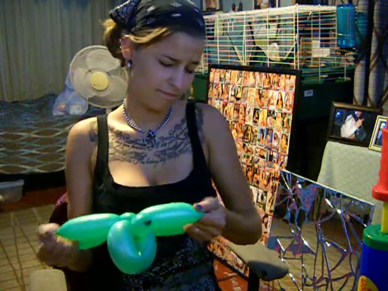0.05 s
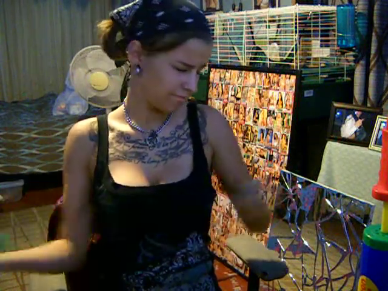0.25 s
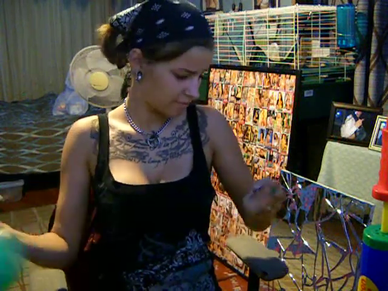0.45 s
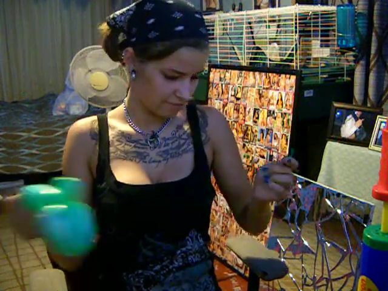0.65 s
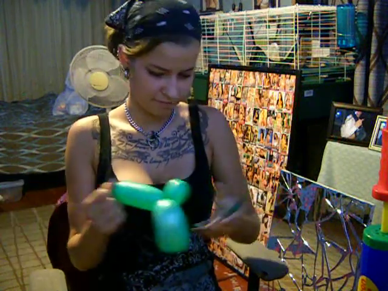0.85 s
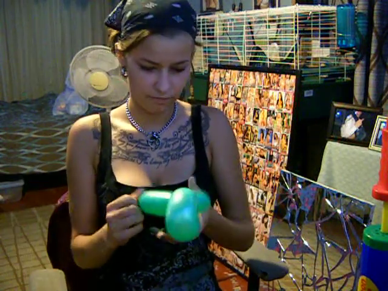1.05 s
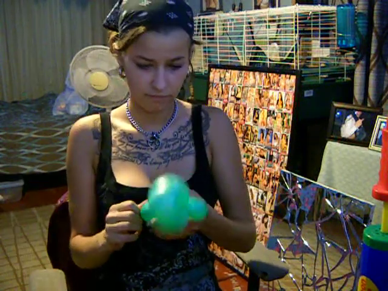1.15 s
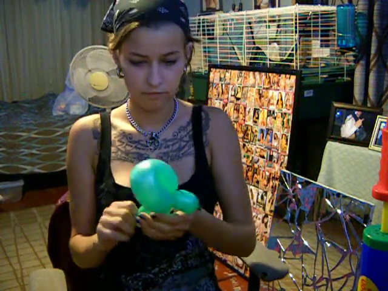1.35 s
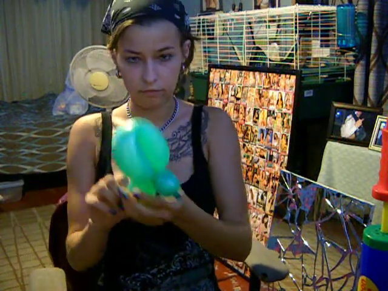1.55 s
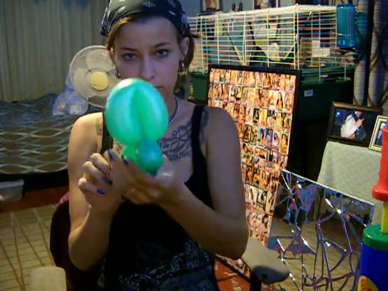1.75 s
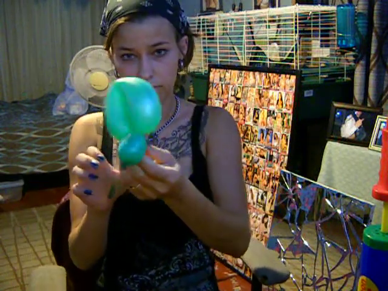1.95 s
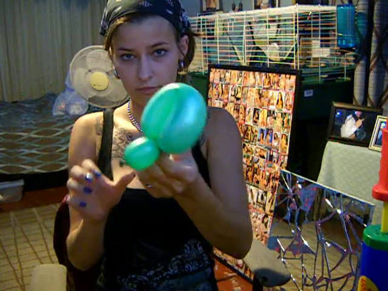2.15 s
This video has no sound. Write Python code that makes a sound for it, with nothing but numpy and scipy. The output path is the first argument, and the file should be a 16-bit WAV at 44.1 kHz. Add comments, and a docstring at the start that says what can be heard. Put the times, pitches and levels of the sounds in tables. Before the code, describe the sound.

A balloon pops loudly after a brief, faint creak of stretched rubber, overloading a muffled microphone in a small, quiet room. Light ticks of falling shreds follow, then soft hollow handling bumps and one short rubbery squeak.

```python
"""Low room noise and hum run throughout. A twisted latex balloon creaks in stick-slip as it is pulled.
At 0.24 s and 0.27 s two chambers burst, each a ringing thump of air and a crack of tearing skin;
the bang overloads the narrow-band microphone and the recorder. Scraps tick down from 0.46 s.
From 0.94 s hands catch the rest with soft bumps; near 1.8 s a finger squeaks across the rubber.
A small room adds a short tail to each event."""
import sys
import numpy as np
from scipy import signal
from scipy.fft import rfft, irfft
from scipy.io import wavfile
from scipy.ndimage import uniform_filter1d

SR = 44100
rng = np.random.default_rng(int(sys.argv[2]) if len(sys.argv) > 2 else 0)


def wrap_up_sound(samples):
    """Save the sound to the file named by the first command line argument, as 16-bit audio."""
    columns = np.atleast_2d(samples).T
    # keep every value between -1 and 1, then stretch to whole-number steps
    tamed = np.clip(columns, -1, 1)
    steps = np.round(tamed * 32767).astype(np.int16)
    wavfile.write(sys.argv[1], SR, steps)


N = 97020

# bursting chambers: t/s, thump level/dB, ring time factor, rip delay/s, rip level/dB, rip t60/s
CHAMBERS = [(.2392, 7.5, 0.57, 0.00029, -7, .04), (.2712, 4, 0.98, .0060, 1.5, 0.091)]


def undb(db):
    """Decibels to gain."""
    return 10 ** (np.asarray(db) / 20)


def unit(x):
    """Scale to rms 1."""
    return x / np.sqrt(np.mean(x ** 2))


def since(start_s=0):
    """Seconds since start_s, per sample."""
    return np.arange(N) / SR - start_s


def curve(table, column=1):
    """Table column, linearly interpolated in time."""
    rows = np.array(table)
    return np.interp(since(), rows[:, 0], rows[:, column])


def colour(x, spectrum):
    """Shape x by (f/Hz, level/dB) points; rms 1."""
    hz, db = np.array(spectrum).T
    bins_hz = np.maximum(np.fft.rfftfreq(N, 1 / SR), 1)
    gain = undb(np.interp(np.log(bins_hz), np.log(hz), db))
    return unit(irfft(rfft(x) * gain, N))


def noise(spectrum):
    """Coloured noise, rms 1."""
    return colour(rng.standard_normal(N), spectrum)


def fade(start_s, t60_s, hold_s=0):
    """Sudden onset, hold, exponential decay."""
    t = since(start_s)
    return (t >= 0) * np.exp(-np.log(1000) * np.maximum(t - hold_s, 0) / t60_s)


def attack(start_s, rise_s):
    """Linear rise from 0 to 1."""
    return np.clip(since(start_s) / rise_s, 0, 1)


def strike(start_s, modes, ring=1):
    """Decaying modes excited together; ring scales their t60."""
    return sum(undb(db) * fade(start_s, t60_s * ring) * np.sin(2 * np.pi * hz * since(start_s))
               for hz, db, t60_s in modes)


def room(x, wet_db):
    """Add a small room's dense reverberation; treble dies sooner."""
    gap_s = 0.0024
    white = rng.standard_normal(N)
    low = signal.sosfilt(signal.butter(2, 1500, fs=SR, output="sos"), white)
    tail = low * fade(gap_s, t60_s=0.23) + (white - low) * fade(gap_s, t60_s=0.19)
    return x + undb(wet_db) * signal.fftconvolve(x, tail / np.linalg.norm(tail))[:N]


def microphone(x, edge_hz=3782, order=14.9):
    """Steep low-pass of the narrow-band microphone."""
    bins_hz = np.fft.rfftfreq(N, 1 / SR)
    return irfft(rfft(x) / np.sqrt(1 + (bins_hz / edge_hz) ** (2 * order)), N)


def saturate(x, ceiling, knee):
    """Flatten peaks at the ceiling; a higher knee is harder."""
    return x / (1 + np.abs(x / ceiling) ** knee) ** (1 / knee)


def background():
    """Steady room noise and a low, wavering hum."""
    floor_spectrum = [(12, -20.5), (25, -1.5), (45, -6), (90, -10), (180, -8.5), (520, -5.5), (900, -9),
                      (1400, -16.5), (2300, -17), (3500, -19.5), (4200, -21), (5200, -55)]  # f/Hz, level/dB
    hum_tones = [(27, -59.5), (59.2, -55)]  # f/Hz, level/dB
    hum_waver = [(0, 5), (.75, -7), (1.1, 0.5), (1.7, -3), (2.1, 4)]  # t/s, gain/dB
    hum = sum(undb(db) * np.sqrt(2) * np.sin(2 * np.pi * (hz * since() + rng.random()))
              for hz, db in hum_tones)
    return undb(-51) * noise(floor_spectrum) + undb(curve(hum_waver)) * hum


def rubbing(tilt_db_per_oct=0):
    """Dense friction through the latex resonances, band-limited; rms 1."""
    latex_spectrum = [(60, -15), (250, -14.5), (550, 2), (800, -3), (1080, -1), (1600, -16), (2200, -2),
                      (2800, -10.5), (3500, -6), (4500, 9)]  # f/Hz, level/dB
    tilted = [(hz, db + tilt_db_per_oct * np.log2(hz)) for hz, db in latex_spectrum]
    return unit(microphone(noise(tilted)))


def bumps():
    """Hands meet the balloon: a hollow bump and a brush of its skin."""
    touches = [(.940, -35.5, -45.5), (0.9557, -32, -49), (1.015, -38.5, -42.5), (1.472, -64, -47),
               (1.553, -51.5, -44), (1.65, -54.5, -48)]  # t/s, bump level/dB, brush level/dB
    balloon_modes = [(128.3, -8, 0.075), (175, -2, 0.095), (354, 4, 0.047), (475, 8, 0.025),
                     (615, -9, 0.043)]  # f/Hz, level/dB, t60/s
    out = 0
    for start_s, bump_db, brush_db in touches:
        bump = undb(bump_db) * strike(start_s, balloon_modes) * attack(start_s, rise_s=0.0015)
        brush = undb(brush_db) * fade(start_s, t60_s=0.071) * rubbing()
        out += bump + brush
    return room(out, wet_db=-6)


def scraps():
    """Light latex shreds land with bright ticks."""
    landings = [(.4580, -18.5, 2850), (0.4777, -20, 3040), (0.5383, -30, 3290), (0.5885, -26, 2840)]  # t/s, level/dB, centre f/Hz
    shred_modes = [(.78, -15.5, 0.018), (1.0, -1, 0.0076), (1.2, -9.5, 0.0079)]  # ratio to centre, level/dB, t60/s
    ticks = 0
    for start_s, level_db, centre_hz in landings:
        modes = [(centre_hz * ratio, db, t60_s) for ratio, db, t60_s in shred_modes]
        ticks += undb(level_db) * strike(start_s, modes)
    return room(ticks, wet_db=-7)


def creak(slips_per_s=1300, scatter_db=2):
    """Stretched rubber creeps in tiny, irregular slips until the first burst."""
    strain_level = [(0, -36.5), (.09, -38.5), (.16, -35), (.198, -34.5), (.22, -38), (.24, -41.5)]  # t/s, level/dB
    rubber_spectrum = [(53, -47), (90, -12.5), (157, 0), (202, -15.5), (269, -16.5), (320, -7.5),
                       (407, -11), (454, 0), (586, -1), (732, -6.5), (871, -8), (1110, -17), (1450, -17.5),
                       (1720, -25.5), (2190, -11.5), (3520, -18), (4000, -20.5), (5200, -60.5),
                       (8800, -120)]  # f/Hz, level/dB
    onsets = rng.random(N) < slips_per_s / SR
    sizes = undb(scatter_db * rng.standard_normal(N)) * rng.choice([-1, 1], N)
    slips = colour(onsets * sizes, rubber_spectrum)
    intact = since(CHAMBERS[0][0]) < 0
    return room(slips * undb(curve(strain_level)) * intact, wet_db=-5.5)


def squeal(jitter=0.04526, jitter_hz=718):
    """Near-periodic stick-slip: three harmonics of unsteady pitch."""
    stroke = [(1.829, 1102, -39.5, -14), (1.840, 1123, -29.5, -8), (1.845, 1088, -16, -10.5),
              (1.851, 1061, -26.5, 8), (1.855, 1054, -26, -10.5), (1.866, 931, -25.5, -31),
              (1.872, 952, -17, -15), (1.883, 1054, -18, -18), (1.890, 1119, -27, -3),
              (1.895, 1157, -27.5, 14.5), (1.900, 1141, -32, 8), (1.906, 1098, -23, 0.5)]  # t/s, slip rate/Hz, level/dB, overtone gain/dB
    harmonics_db = [-1.5, -2.5, -2]  # level/dB, fundamental first
    width = int(SR / jitter_hz)
    waver = unit(uniform_filter1d(uniform_filter1d(rng.standard_normal(N), width), width))
    slip_hz = curve(stroke, column=1) * (1 + jitter * waver)
    phase = 2 * np.pi * np.cumsum(slip_hz) / SR
    overtone_db = curve(stroke, column=3)
    tone = sum(undb(db + (n > 1) * overtone_db) * np.sin(n * phase)
               for n, db in enumerate(harmonics_db, 1))
    gate = (since(stroke[0][0]) > 0) * (since(stroke[-1][0]) < 0)
    return np.sqrt(2) * tone * undb(curve(stroke, column=2)) * gate


def squeak(scrape_start_s=1.830, scrape_end_s=1.905, ramp_s=0.0074):
    """A finger slips three times, then scrapes and locks into a brief squeal."""
    finger_slips = [(1.7713, -27.5, -3.5), (1.795, -38.5, -0.5), (1.814, -23, 4)]  # t/s, level/dB, tilt/(dB per octave)
    tone = squeal()
    contact = np.clip(np.minimum(since(scrape_start_s), -since(scrape_end_s)) / ramp_s, 0, 1)
    scrape = undb(-26.5) * contact * rubbing()
    slips = sum(undb(db) * fade(start_s, t60_s=0.033) * attack(start_s, rise_s=0.0032) * rubbing(tilt)
                for start_s, db, tilt in finger_slips)
    return room(tone + scrape + slips, wet_db=-8.5)


def bursts():
    """Each chamber releases a ringing thump of air and the crack of its tearing skin."""
    air_modes = [(163.5, -22, .17), (289.6, -7.5, 0.12), (458.2, -6, 0.12), (615.2, 0.5, 0.14),
                 (688.4, -8.5, .18), (744.8, -8, .16), (838, -12.5, 0.2), (949.6, -18.5, 0.16),
                 (1422, -16.5, .16), (1485, -21.5, .16), (1999, -17, .16)]  # f/Hz, level/dB, t60/s before the ring factor
    rip_spectrum = [(25, -10), (70, -10), (200, -7), (600, 7), (1100, 0.5), (1600, -6.5), (2100, 2),
                    (2700, -7), (3500, -5), (4500, -9.5), (6000, -37)]  # f/Hz, level/dB
    air, skin = 0, 0
    for start_s, thump_db, ring, delay_s, rip_db, rip_t60_s in CHAMBERS:
        air += undb(thump_db) * strike(start_s, air_modes, ring)
        skin += undb(rip_db) * fade(start_s + delay_s, rip_t60_s, hold_s=0.014) * noise(rip_spectrum)
    return room(air, wet_db=-14.5) + room(skin, wet_db=-6.5)


def scene():
    """All sources in the room, mono."""
    return (creak() + bursts() + scraps() + bumps() + squeak() + background())[None]


def record(dry):
    """The microphone overloads and narrows the band; the recorder clips and cuts the top."""
    heard = microphone(saturate(dry, ceiling=0.9, knee=5.4))
    clipped = saturate(heard, ceiling=0.77, knee=19)
    top_hz = 16000
    return signal.sosfilt(signal.ellip(8, .2, 70, top_hz, fs=SR, output="sos"), clipped)


dry = scene()
out = record(dry)
wrap_up_sound(out)
```